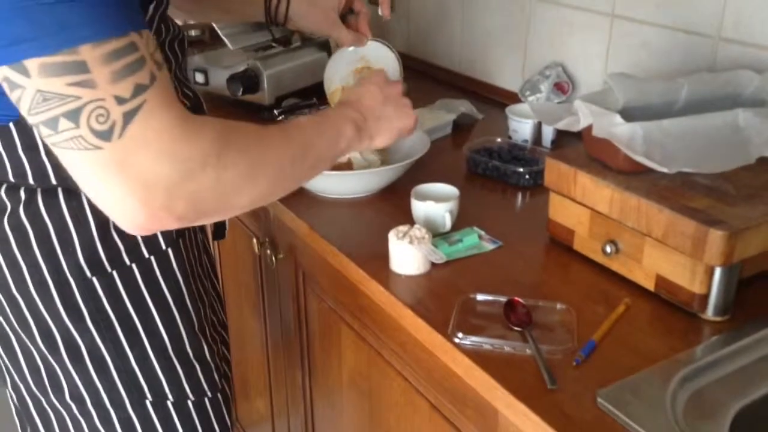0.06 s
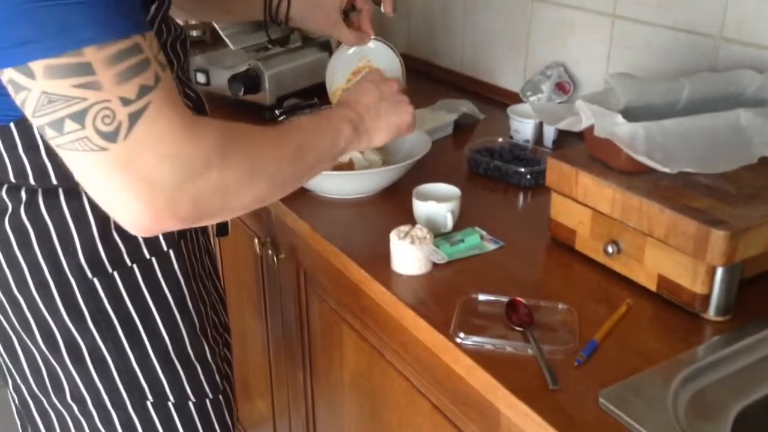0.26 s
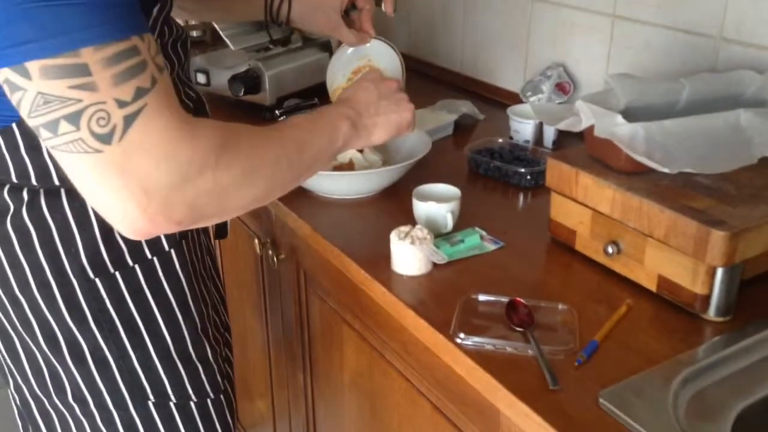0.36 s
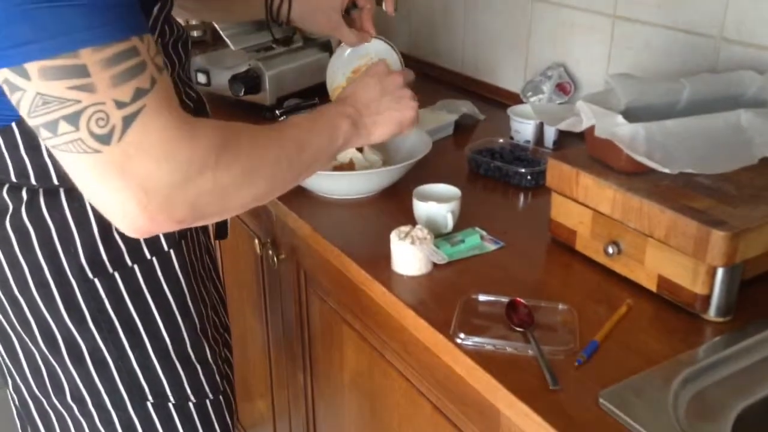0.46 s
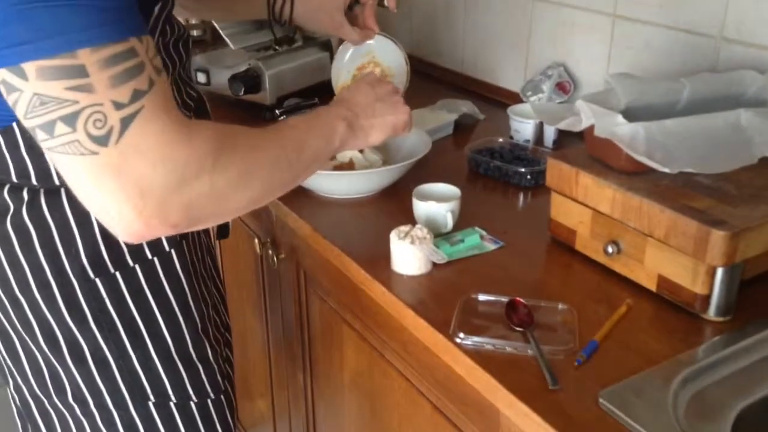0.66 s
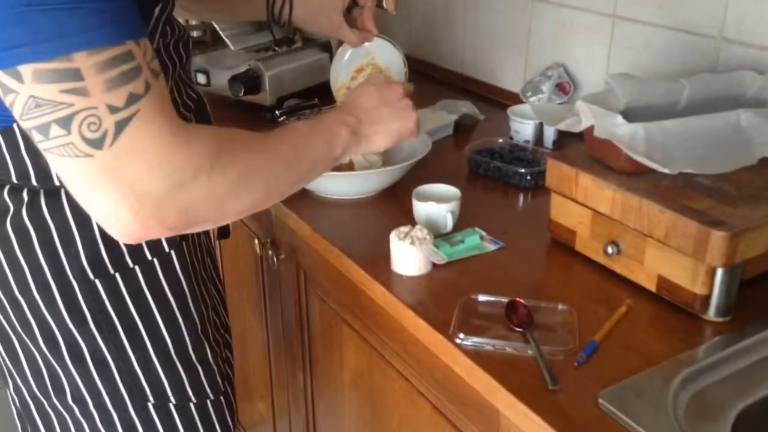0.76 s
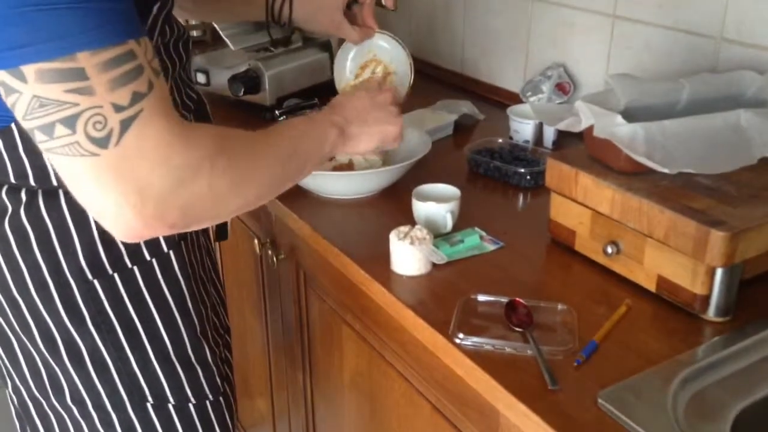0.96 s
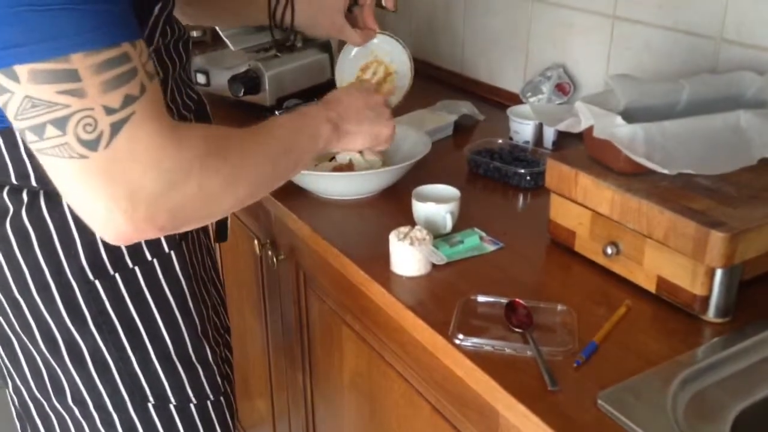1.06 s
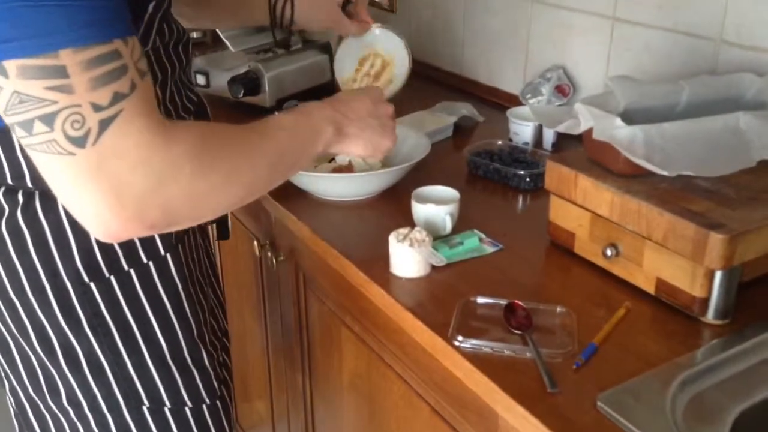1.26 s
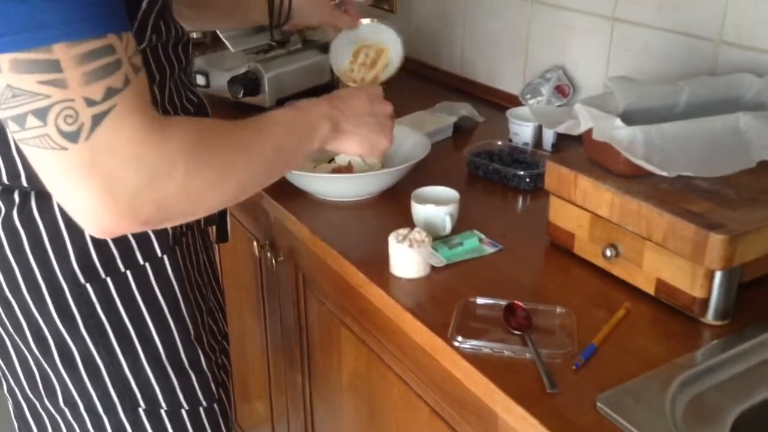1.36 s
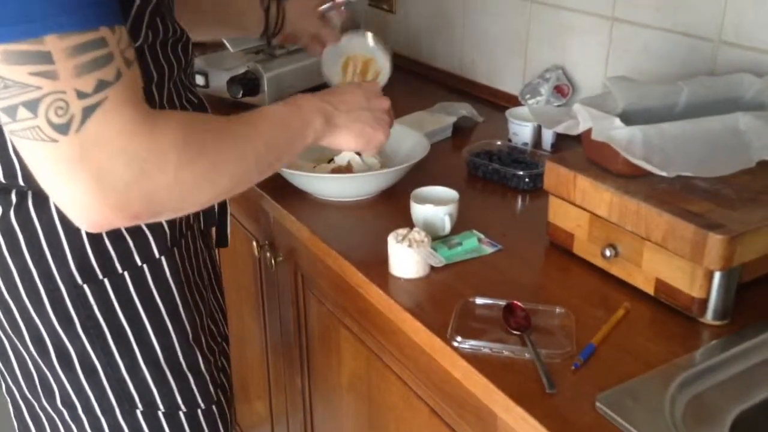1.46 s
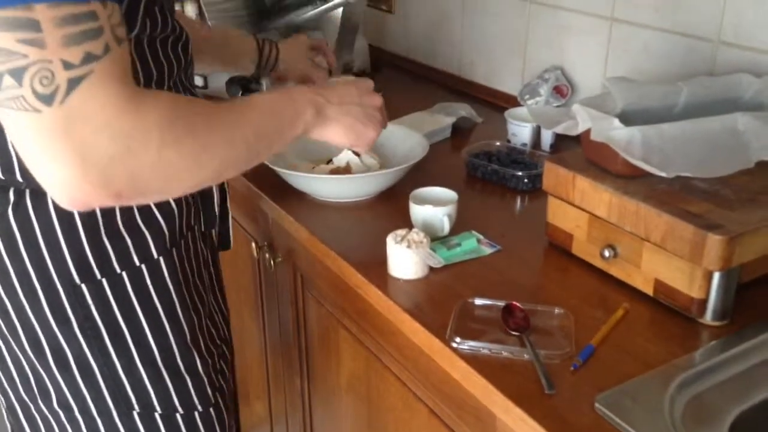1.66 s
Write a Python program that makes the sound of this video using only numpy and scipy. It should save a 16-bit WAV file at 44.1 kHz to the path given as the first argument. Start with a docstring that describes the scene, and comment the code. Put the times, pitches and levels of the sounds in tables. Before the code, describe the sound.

A steel spoon taps the rim of a small china dish, sharp and briefly ringing. It opens on the fading ring of a tap, then come double clinks at about 0.2 and 0.55 seconds and a single one at 0.9. A faint scrape and tick follow just after 1 second, food slides very softly into a bowl from 1.2, and a tiny tick comes near 1.45, with short kitchen reverberation.

```python
"""Spoon tapping a china dish

A steel spoon taps the rim of a small china dish over a mixing bowl, about three times a second, in a
tiled kitchen. Each tap is a hard knock that sets spoon and dish ringing, mostly with a lighter second
contact just after. Then the spoon scrapes briefly off the rim and the food slides softly into the bowl."""
import sys
import numpy as np
from scipy import signal
from scipy.fft import rfft, irfft
from scipy.io import wavfile

SR = 44100
rng = np.random.default_rng(int(sys.argv[2]) if len(sys.argv) > 2 else 0)


def materialize(psi):
    """Save the field psi as 16-bit PCM at rate SR to the path in sys.argv[1].

    A 1-D psi becomes a single channel; in a 2-D psi each row is a channel.
    """
    bounded = np.clip(np.atleast_2d(psi).T, -1, 1)
    quanta = np.round(bounded * 32767).astype(np.int16)
    wavfile.write(sys.argv[1], SR, quanta)


N = 74970

# Spoon-on-rim hits; those before zero ring into the opening:
# (time [s], knock level [dB], dish ring level [dB], spoon ring level [dB], spoon tilt [dB/octave])
RIM_HITS = [(-0.1, -4, -7, -1, -6), (-0.04, -4, 1.5, -7, -7.5), (0.2107, 1, 3, 2, -3),
            (0.2953, -2.5, 2, -18.5, 5), (0.537, -0.5, -3.5, -1, 1.5), (0.5981, -4, 2.5, -14, -7),
            (0.8835, -0.5, 0, -5.5, 11), (1.054, -30, -22, -34.5, 2), (1.448, -44, -39, -54, -12)]
# Partials of the china dish: (frequency [Hz], level [dB], t60 [s])
CHINA_MODES = [(363, -53.5, 0.19), (644, -40, 0.032), (1091, -35.5, 0.072), (1653, -39, 0.12),
               (2428, -31, 0.055), (3327, -38, 0.054), (4988, -27, 0.032), (5197, -22, 0.059),
               (5239, -35.5, 0.18)]
# Partials of the steel spoon: (frequency [Hz], level [dB], t60 [s])
STEEL_MODES = [(5284, -33.5, 0.08), (5446, -19, 0.033), (5550, -17, 0.019), (5830, -22.5, 0.039),
               (6400, -30.5, 0.033), (7160, -23, 0.12), (7235, -31, 0.24), (7300, -22, 0.04),
               (9650, -25, 0.034), (10170, -18.5, 0.067), (10305, -19.5, 0.087), (10240, -16.5, 0.021),
               (10594, -15.5, 0.014), (14400, -23, 0.023)]
# Tone of the knock: (frequency [Hz], level [dB])
KNOCK_EQ = [(60, -40), (130, -32), (230, -3.5), (370, -3), (470, -6), (650, 4), (850, 3), (1080, 7.5),
            (1600, 5.5), (2000, 4), (2500, 5), (3100, 2.5), (3850, 7.5), (4500, -5.5), (5200, 7),
            (7200, 7.5), (8400, -3), (10200, 0), (11800, -6), (14500, 4.5), (16000, -27)]
# Early reflections off worktop and tiles: (delay [s], level [dB])
REFLECTIONS = [(.0023, -12), (.007, -5)]
# Reverb time of the kitchen: (frequency [Hz], t60 [s])
KITCHEN_DECAY = [(150, 0.55), (400, 0.31), (1100, 0.39), (3000, 0.41), (7000, 0.36), (14000, 0.27)]
# Tone of steel scraping china: (frequency [Hz], level [dB])
SCRAPE_EQ = [(80, -35), (200, -11), (1000, -4.5), (2500, -7.5), (3400, -0.5), (4100, 9), (4600, -14),
             (5200, 8.5), (6500, -2.5), (8200, 4.5), (10300, -8), (12000, -9), (14000, 0), (15300, -16)]
# Tone of the sliding food: (frequency [Hz], level [dB])
SLIDE_EQ = [(80, -40), (140, -11), (220, 4), (400, -18), (800, -2.5), (1000, 4.5), (1280, 0), (1600, -9.5),
            (3000, -10.5), (6000, -29), (15000, -35)]
# Tone of the background hiss: (frequency [Hz], level [dB])
ROOM_TONE_EQ = [(25, -48), (60, -30), (100, -18), (150, -3.5), (240, 0), (400, -0.5), (700, -5),
                (1200, -5.5), (2000, -7), (5000, -11), (10000, -13), (15000, -15)]

PREROLL_S = .2
PREROLL_SAMPLES, TAIL_SAMPLES = int(PREROLL_S * SR), 24000
TIME = np.arange(-PREROLL_SAMPLES, N) / SR
TAIL_TIME = np.arange(TAIL_SAMPLES) / SR


def from_db(db):
    """Decibels to gain."""
    return 10 ** (np.asarray(db) / 20)


def unit_energy(x):
    """Scale to a sum of squares of one."""
    return x / np.sqrt(np.sum(x ** 2) + 1e-20)


def at_hz(curve, hz):
    """Read a curve on a log-frequency axis."""
    freqs, values = np.transpose(curve)
    return np.interp(np.log(np.maximum(hz, 1)), np.log(freqs), values)


def decay(t, t60):
    """Full level until time zero, then 60 dB down every t60 seconds."""
    return np.exp(-np.log(1000) * np.maximum(t, 0) / t60)


def convolve(x, response):
    """Play a sound through an impulse response, keeping its length."""
    return signal.fftconvolve(x, response)[:len(x)]


def equalise(x, eq, size=8192):
    """Minimum-phase EQ: nothing rings ahead of a transient."""
    gain = from_db(at_hz(eq, np.fft.rfftfreq(size, 1 / SR)))
    cepstrum = irfft(np.log(gain))
    cepstrum[1:size // 2] *= 2
    cepstrum[size // 2 + 1:] = 0
    return convolve(x, irfft(np.exp(rfft(cepstrum))))


def noise(eq):
    """Coloured noise at an rms of one."""
    x = equalise(rng.standard_normal(len(TIME)), eq)
    return x / x.std()


def room_tone():
    """A quiet, steady bed of hiss, fullest in the low mids."""
    return from_db(-62) * noise(ROOM_TONE_EQ)


def kitchen_reverb(x, build_s=0.0013, wet_db=-2.5):
    """Diffuse tail that blooms fast and dies soonest in the top; each send gets its own fine grain."""
    hz = np.fft.rfftfreq(TAIL_SAMPLES, 1 / SR)
    white = rfft(rng.standard_normal(TAIL_SAMPLES))
    edges_hz = [0, 200, 400, 800, 1600, 3200, 6400, 9000, 12500, 22050]
    tail = np.zeros(TAIL_SAMPLES)
    for low, high in zip(edges_hz, edges_hz[1:]):
        band = irfft(white * (hz >= low) * (hz < high))
        tail += band * decay(TAIL_TIME, at_hz(KITCHEN_DECAY, (low + high) / 2))
    bloom = 1 - np.exp(-TAIL_TIME / build_s)
    return from_db(wet_db) * convolve(x, unit_energy(tail * bloom))


def with_reflections(x):
    """The direct sound plus its first bounces off worktop and tiles."""
    return x + sum(from_db(db) * np.pad(x, (round(delay * SR), 0))[:len(x)] for delay, db in REFLECTIONS)


def friction(eq, start_s, attack_s, hold_s, t60_s, rough_db, grain_s=.004):
    """Rubbing noise with an attack, a hold and a release, roughened by uneven grip."""
    t = TIME - start_s
    envelope = np.clip(t / attack_s, 0, 1) * decay(t - attack_s - hold_s, t60_s)
    grip = np.interp((TIME + PREROLL_S) / grain_s, np.arange(N), rng.standard_normal(N))
    return envelope * from_db(rough_db * grip) * noise(eq)


def food_slide():
    """Food slips into the bowl: a soft, dull rub that trails away."""
    rub = friction(SLIDE_EQ, start_s=1.22, attack_s=0.0091, hold_s=0.066, t60_s=0.52, rough_db=2.5)
    return from_db(-60) * rub


def spoon_scrape():
    """Steel drags off the china rim: a short, bright rasp."""
    rub = friction(SCRAPE_EQ, start_s=1.042, attack_s=0.0097, hold_s=0.0098, t60_s=0.034, rough_db=1)
    return from_db(-47) * rub


def dense_ring(decay_s, size=4096):
    """Countless close modes of even strength dying together, at an energy of one."""
    t = np.arange(size) / SR
    spectrum = rfft(rng.standard_normal(size) * decay(t, decay_s))
    flat_burst = irfft(spectrum / np.abs(spectrum))
    return unit_energy(flat_burst * decay(t, 2 * decay_s))


def rim_knock():
    """The hard transient of steel meeting china: a sharp crack layered on a short body."""
    crack = from_db(-5) * dense_ring(decay_s=0.0046)
    body = from_db(-1.27) * dense_ring(decay_s=0.061)
    return equalise(np.pad(crack + body, (0, TAIL_SAMPLES - len(body))), KNOCK_EQ)


def ring(modes):
    """A struck object's partials: decaying sines of alternating polarity."""
    return sum((-1) ** k * from_db(db) * np.sin(2 * np.pi * hz * TAIL_TIME) * decay(TAIL_TIME, t60)
               for k, (hz, db, t60) in enumerate(modes))


def spoon_tap(knock_db, dish_db, spoon_db, tilt_db_per_octave, pivot_hz=7500):
    """One hit with its reverb: knock, dish ring and spoon ring, balanced by where the two meet."""
    knock = from_db(knock_db) * rim_knock()
    spoon_modes = [(hz, db + tilt_db_per_octave * np.log2(hz / pivot_hz), t60)
                   for hz, db, t60 in STEEL_MODES]
    ringing = from_db(dish_db) * ring(CHINA_MODES) + from_db(spoon_db) * ring(spoon_modes)
    reverb_send = knock + from_db(-3.5) * ringing
    return with_reflections(knock) + ringing + kitchen_reverb(reverb_send)


def spoon_tapping():
    """Every hit on the rim laid on its cue, tails overlapping."""
    track = np.zeros(len(TIME) + TAIL_SAMPLES)
    for time_s, *balance in RIM_HITS:
        start = PREROLL_SAMPLES + round(time_s * SR)
        track[start:start + TAIL_SAMPLES] += spoon_tap(*balance)
    return track[:len(TIME)]


def scene():
    """Mono mix: taps up front, scrape and sliding food far below them, room tone underneath."""
    taps = spoon_tapping()
    rubbing = spoon_scrape() + food_slide()
    mix = taps + rubbing + kitchen_reverb(rubbing) + room_tone()
    return mix[None, PREROLL_SAMPLES:]


def record(dry, cutoff_hz=15250):
    """A steep low-pass takes the very top off the mix."""
    return signal.sosfilt(signal.ellip(10, .2, 70, cutoff_hz, fs=SR, output="sos"), dry)


dry = scene()
out = record(dry)
materialize(out)
```